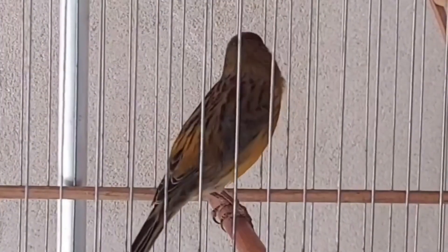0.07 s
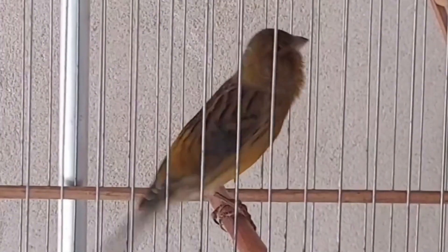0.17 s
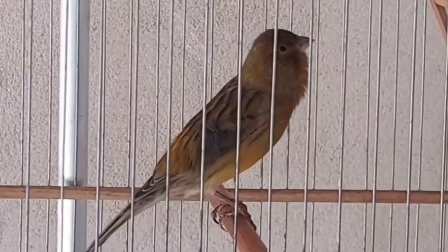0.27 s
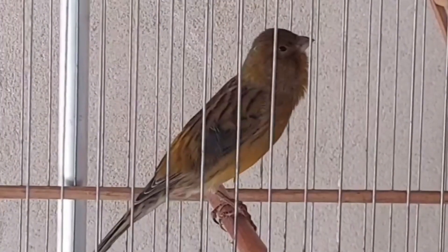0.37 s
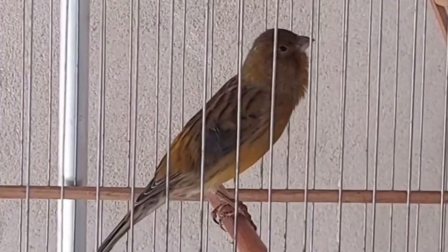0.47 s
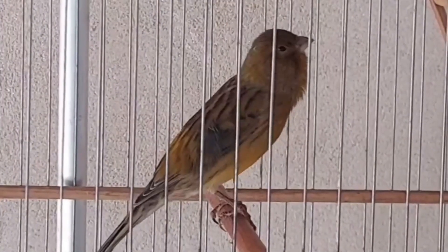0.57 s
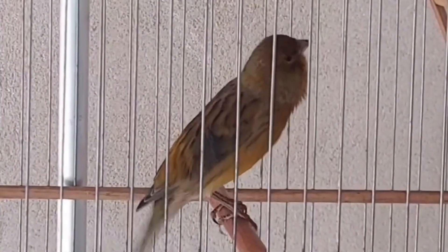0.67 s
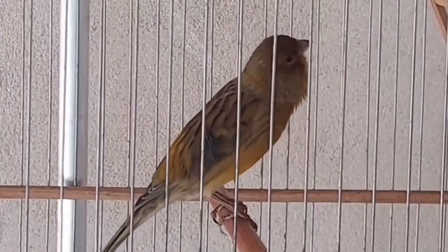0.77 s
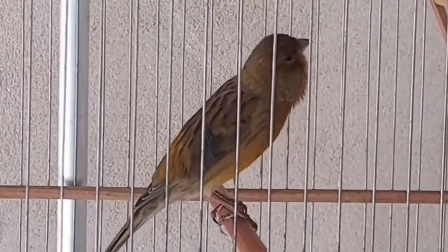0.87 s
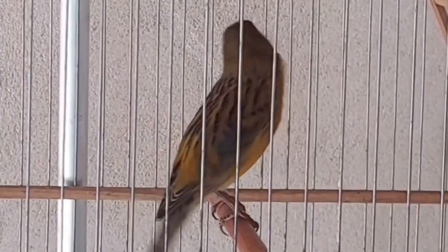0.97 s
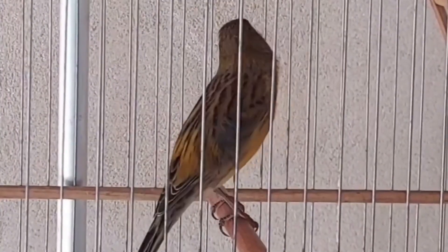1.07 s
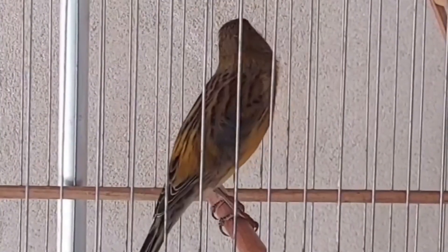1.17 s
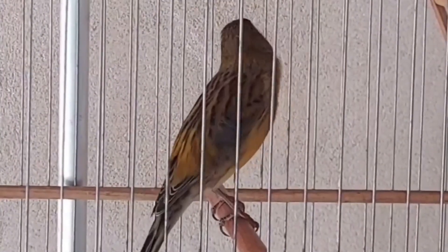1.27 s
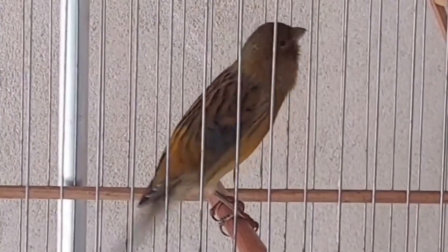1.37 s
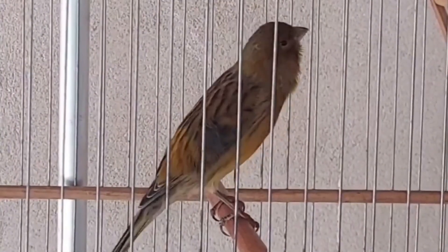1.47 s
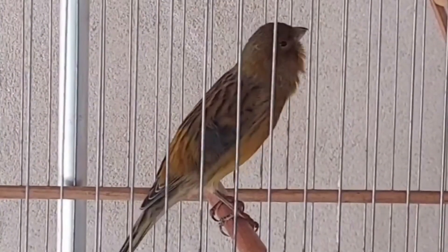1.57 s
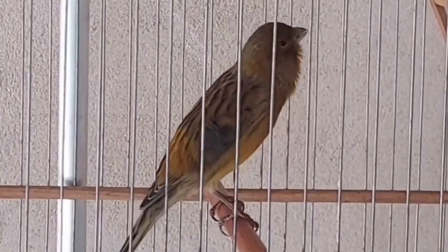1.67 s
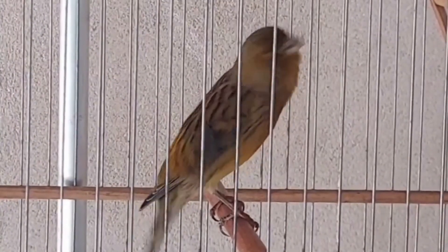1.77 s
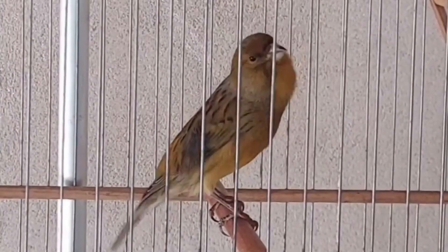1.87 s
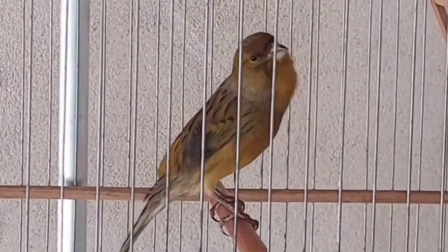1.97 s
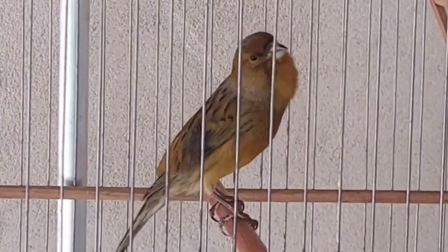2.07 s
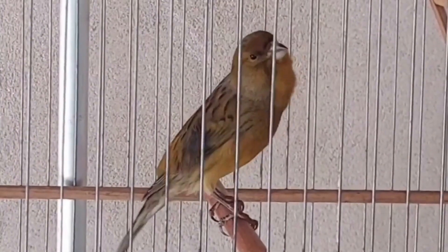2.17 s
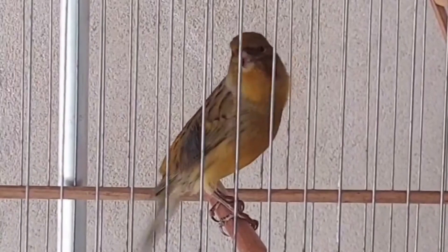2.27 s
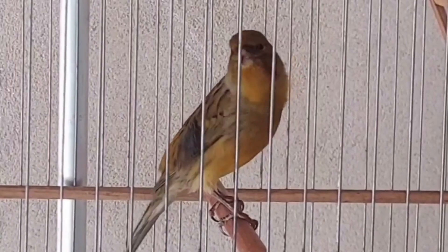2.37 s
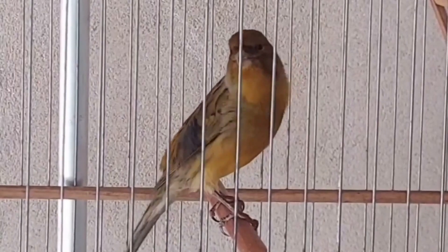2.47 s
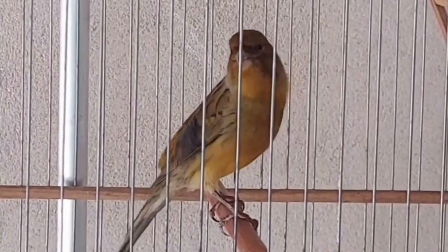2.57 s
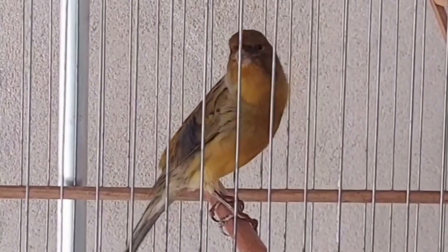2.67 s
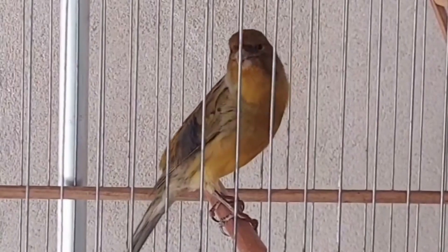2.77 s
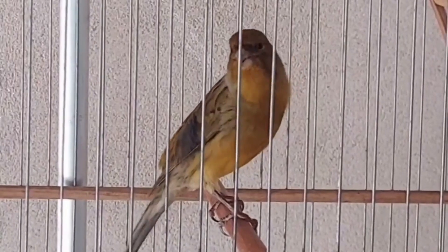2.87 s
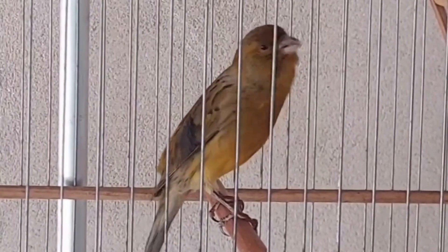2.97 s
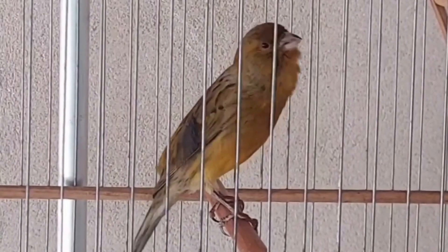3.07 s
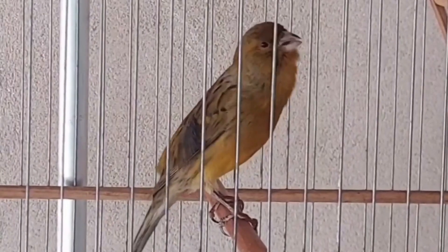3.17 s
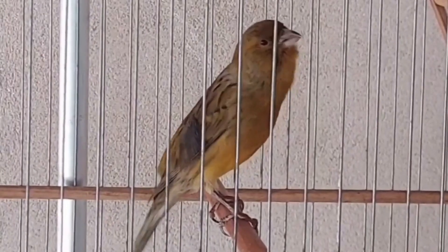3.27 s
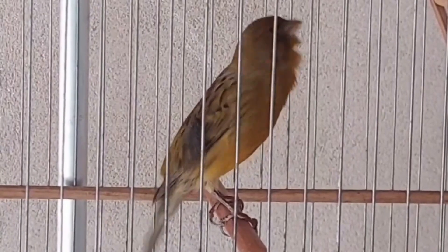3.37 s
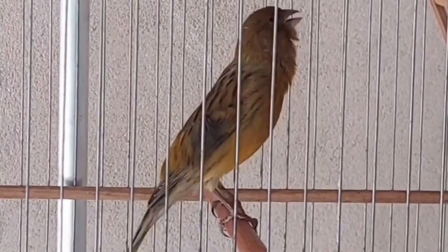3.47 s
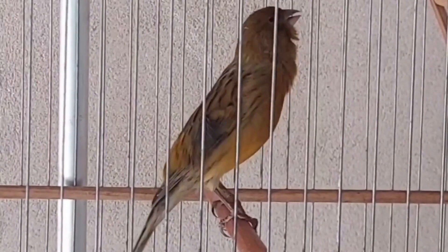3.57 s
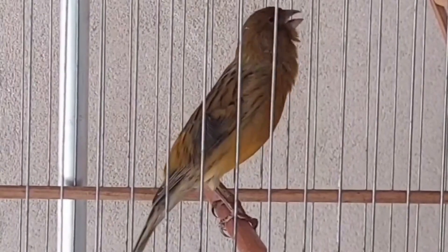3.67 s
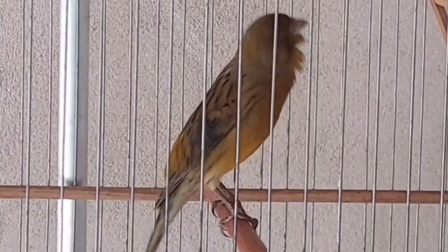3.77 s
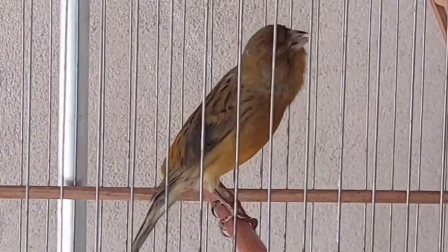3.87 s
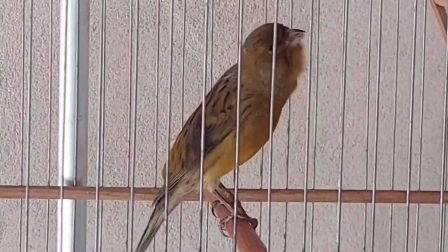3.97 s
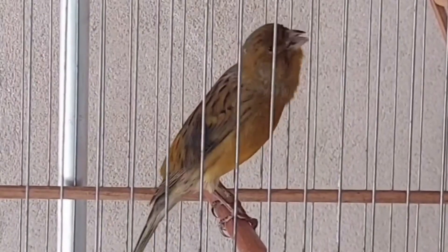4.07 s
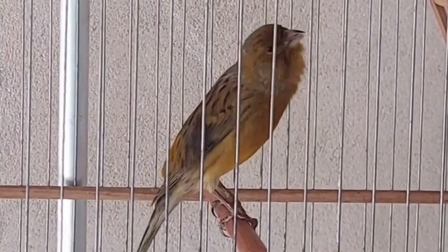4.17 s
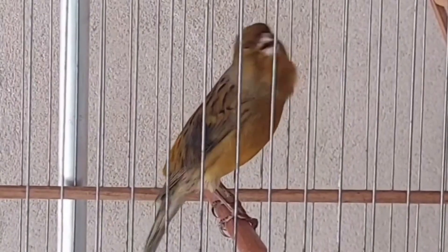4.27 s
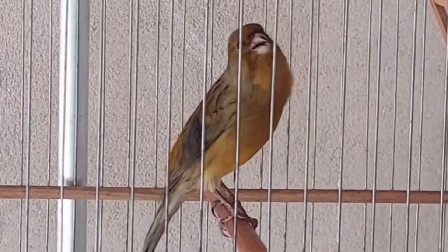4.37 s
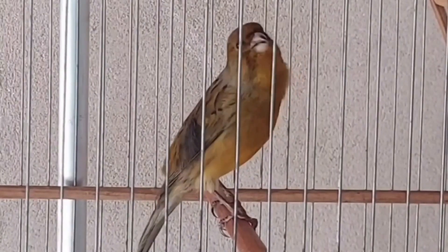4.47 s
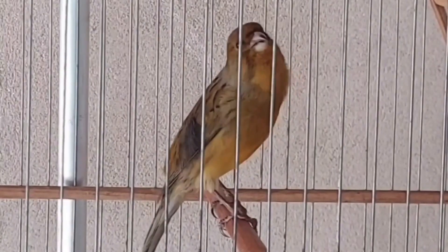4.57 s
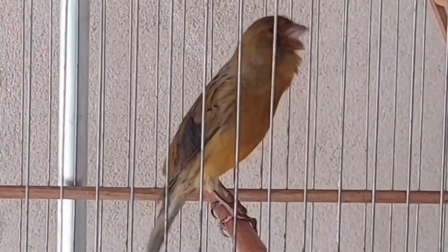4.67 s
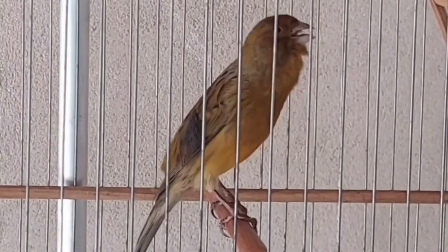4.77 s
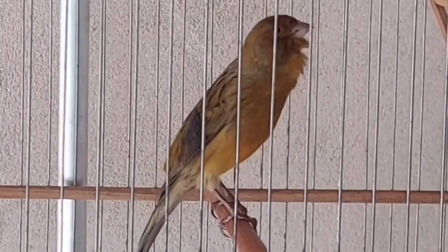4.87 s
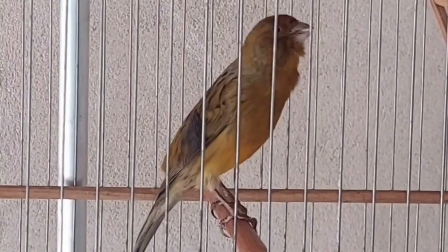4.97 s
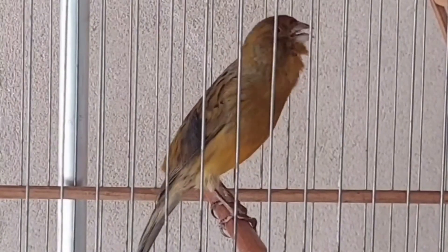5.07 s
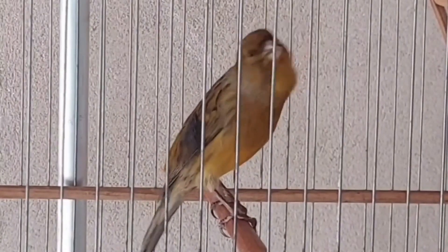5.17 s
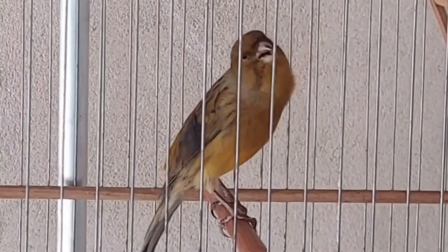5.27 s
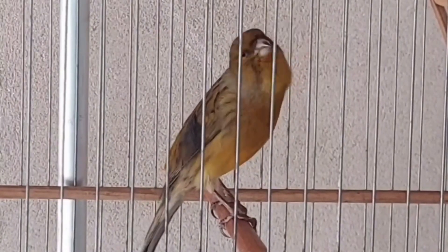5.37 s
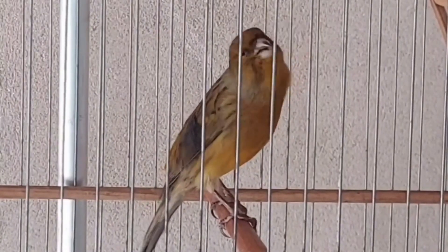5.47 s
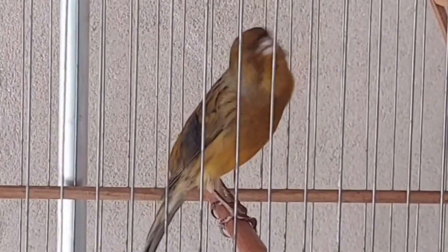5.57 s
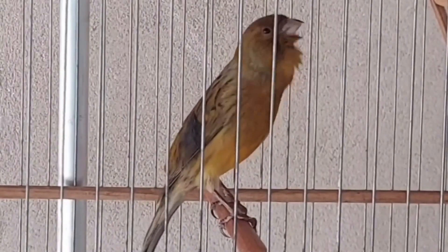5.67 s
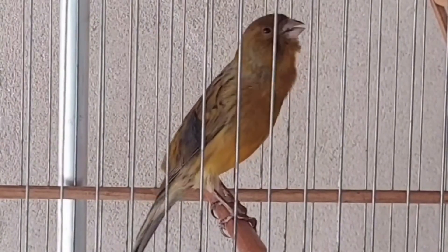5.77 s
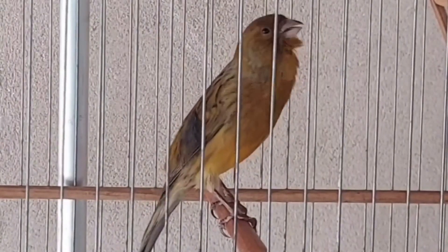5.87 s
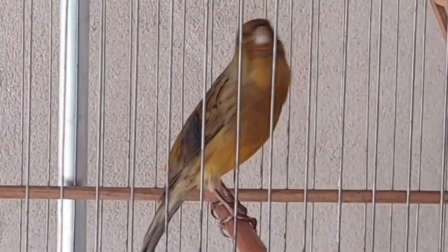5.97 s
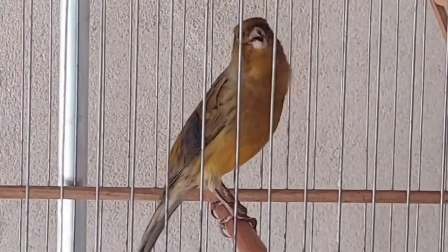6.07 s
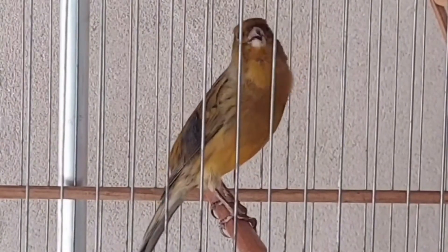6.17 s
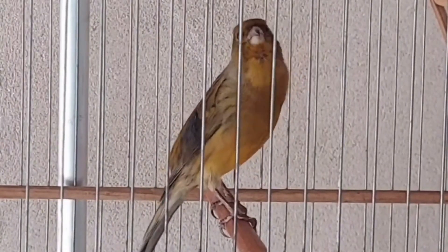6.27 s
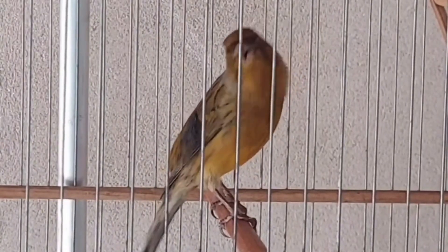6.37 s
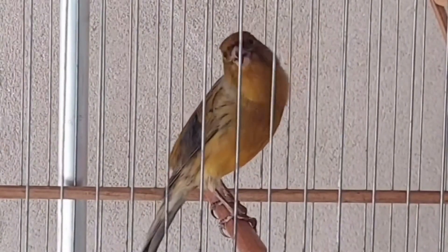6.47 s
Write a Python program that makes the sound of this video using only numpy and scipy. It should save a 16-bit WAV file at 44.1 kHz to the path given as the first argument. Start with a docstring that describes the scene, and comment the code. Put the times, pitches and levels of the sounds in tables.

```python
"""Caged canary, close up

A small, hard-walled room, the microphone close to the cage. A soft roll of quick upsweeps stops
briefly; then loud falling whistles follow, ever longer and slower, each an almost pure tone from the
bird's syrinx. The wall behind the cage and the room smear every note. Far off, a motor hums under
the room's rumble."""
import sys
import numpy as np
from scipy import signal
from scipy.fft import rfft, irfft
from scipy.io import wavfile
from scipy.ndimage import uniform_filter1d

SR = 44100
rng = np.random.default_rng(int(sys.argv[2]) if len(sys.argv) > 2 else 0)


def wrap_up_sound(samples):
    """Save the sound to the file named by the first command line argument, as 16-bit audio."""
    columns = np.atleast_2d(samples).T
    # keep every value between -1 and 1, then stretch to whole-number steps
    tamed = np.clip(columns, -1, 1)
    steps = np.round(tamed * 32767).astype(np.int16)
    wavfile.write(sys.argv[1], SR, steps)


N = 286650
TIME = np.arange(N) / SR
BIN_HZ = np.arange(N // 2 + 1) * SR / N


def undb(db):
    """Decibels to gain."""
    return 10 ** (np.asarray(db) / 20)


def unit(x):
    """Scale to rms 1."""
    return x / np.sqrt(np.mean(x ** 2))


def pan(right_db):
    """Left and right gains, the right one louder by right_db."""
    return undb([[-right_db / 2], [right_db / 2]])


def curves(table):
    """The columns of a time table, one value a sample."""
    s, *columns = np.transpose(table)
    return [np.interp(TIME, s, c) for c in columns]


def gain_at(hz, spectrum):
    """Gain from (Hz, dB) points on a log-frequency axis."""
    f, db = np.transpose(spectrum)
    return undb(np.interp(np.log(np.maximum(hz, 1)), np.log(f), db))


def walk(rate_hz, size):
    """Smooth random drift with spread 1 that changes about rate_hz times a second."""
    k = max(int(SR / rate_hz), 1)
    held = np.repeat(rng.standard_normal(size // k + 2), k)
    return unit(uniform_filter1d(uniform_filter1d(held, k), k))[:size]


def add(track, s, sound):
    """Mix a sound into a track at time s."""
    i = max(int(s * SR), 0)
    part = sound[:max(N - i, 0)]
    track[i:i + len(part)] += part


def along(shape, u):
    """Read (place, value) points at u; a place runs from 0 at a note's start to 1 at its end."""
    return np.interp(u, *np.transpose(shape))


def bump(u, place, width=0.1284):
    """A smooth hump around one place of a note, 1 at its top."""
    return np.exp(-((u - place) / width) ** 2)


def swell(u, peak, rise_db, fade_db):
    """Level in dB, 0 at the place peak, with one slope before and one after, both per note length."""
    return np.minimum(rise_db * (u - peak), fade_db * (peak - u))


def fall(shape, length_s, wander=0.00898):
    """Places along a whistle and its pitch there, corners rounded, never quite the same twice."""
    u = np.linspace(0, 1, int(length_s * SR))
    hz = uniform_filter1d(along(shape, u), size=len(u) // 12, mode="nearest")
    return u, hz * (1 + wander * walk(54, len(u)))


# Stereo width of the room tone at the microphone: f/Hz, side minus mid/dB
WIDTH = [(30, -4), (80, -5), (170, -12.5), (330, -9.5), (700, -2.5), (1400, -2)]
def stereo_noise(spectrum):
    """Coloured noise, most alike left and right in the upper bass and widest in the treble."""
    mid, side = rfft(rng.standard_normal((2, N))) * gain_at(BIN_HZ, spectrum)
    side = side * gain_at(BIN_HZ, WIDTH)
    return unit(irfft(np.array([mid + side, mid - side]), N))


# Spectra of the rumble, wash and hiss all around the microphone: f/Hz, relative density/dB
RUMBLE = [(22, -31), (42, -15), (56, -0.5), (78, -1.5), (100, 5), (125, -0.5), (145, -2.5), (190, -2.5),
          (300, -27), (1000, -38.5)]
WASH = [(100, -10.5), (145, 2.5), (195, -5), (230, 3), (300, -4), (380, -4), (430, -7), (750, -6.5),
        (1100, -14), (2000, -17.5), (6000, -59)]
HISS = [(1000, -26), (5000, 2.5), (7000, 11), (10300, 7), (11000, -24), (12000, -41), (14000, -46)]
# The wash swells and ebbs: t/s, relative level/dB
WASH_SWELL = [(0, -52), (2.15, -46), (2.7, -50), (3.8, -50.5), (4.5, -54.5), (6.5, -53)]
def room_tone(rumble_db=-54, wash_gain_db=2, hiss_db=-67):
    """Deep rumble a little to the right, a higher, slowly swelling wash and a faint even hiss."""
    swell_db, = curves(WASH_SWELL)
    rumble = undb(rumble_db) * pan(right_db=3) * stereo_noise(RUMBLE)
    wash = undb(swell_db + wash_gain_db) * stereo_noise(WASH)
    return rumble + wash + undb(hiss_db) * stereo_noise(HISS)


# A motor in the distance, slowly running down: t/s, firing rate/Hz
MOTOR_RATE = [(0, 85.6), (2.3, 86.24), (4.2, 83.76), (6, 80.97), (6.5, 81.5)]
# Its fundamental booms only at the end: t/s, relative level/dB
MOTOR_BOOM = [(2.2, -58), (5.4, -74), (6.05, -50), (6.5, -49)]
# Its drone comes and goes: t/s, relative level of second harmonic/dB, of third harmonic/dB
MOTOR_DRONE = [(0, -49, -68), (.6, -60.5, -60.5), (1.15, -49.5, -44), (1.5, -49.5, -53.5), (2.2, -50, -48),
               (2.8, -60, -51), (3.15, -49, -55.5), (3.8, -46.5, -54.5), (4.2, -56, -69), (5.4, -64, -60.5),
               (6.5, -48, -51)]
def motor(waver=0.01612, flutter_db=3):
    """The three lowest harmonics of a far motor's firing rate, wavering and slowly sinking."""
    hz, = curves(MOTOR_RATE)
    levels = curves(MOTOR_BOOM) + curves(MOTOR_DRONE)
    phase = 2 * np.pi * np.cumsum(hz * (1 + waver * walk(16, N))) / SR
    return sum(np.sqrt(2) * undb(db + flutter_db * walk(16, N)) * np.sin(k * phase)
               for k, db in enumerate(levels, 1))


def room_response(near_db=-3, near_s=0.019, tail_db=-1, gap_s=0.011, t60_s=0.74, treble_t60_s=0.39):
    """A quick scatter from the cage and the wall behind it, then the ring of the hard-walled room."""
    t = np.arange(SR) / SR
    hz = np.arange(SR // 2 + 1)
    near, tail = rng.standard_normal((2, 2, SR))
    near = near ** 3 * (t > 0.0008) * np.exp(-t / near_s)
    # the first returns from the walls are separate echoes that soon crowd together
    density = np.clip((t / 0.06) ** 2, 0.01, 1)
    tail = tail * (rng.random((2, SR)) < density) / np.sqrt(density) * (t > gap_s)
    low = irfft(rfft(tail) / (1 + (hz / 5000) ** 4), SR)
    tail = low * 1000 ** (-t / t60_s) + (tail - low) * 1000 ** (-t / treble_t60_s)
    return sum(undb(db) * part / np.linalg.norm(part, axis=1, keepdims=True)
               for db, part in [(near_db, near), (tail_db, tail)])


# The bird turns its head and opens its beak in front of the microphone:
# t/s, direct gain/dB, sheen gain/dB, high sheen gain/dB
POSTURE = [(0, -3.5, -34, -62), (1.4, -4.5, -32.5, -50), (1.6, -6.5, -26, -47), (2.4, -1, -28, -46),
           (3.4, -3, -39.5, -44), (3.7, -5, -23, -37.5), (4.6, -2.5, -28, -27), (5.4, -2, -26.5, -36.5),
           (6.5, -1, -28, -34)]
def room(song, left_lag_s=0.00001, beam_hz=8000, spill_db=-16):
    """The beak beams its overtones past the microphone, so they arrive mostly by way of the walls."""
    facing_db, *_ = curves(POSTURE)
    lowpass = 1 / (1 + (BIN_HZ / beam_hz) ** 8)
    off_axis = undb(spill_db) + (1 - undb(spill_db)) * lowpass
    direct = undb(facing_db) * irfft(rfft(song) * off_axis, N)
    left = np.interp(TIME - left_lag_s, TIME, direct)
    # the song is already under way, so the room rings with earlier notes from the start
    lead = SR // 7
    reflected = signal.fftconvolve(np.r_[song[:lead], song][None], room_response(), axes=1)
    return np.array([left, direct]) + reflected[:, lead:lead + N]


# Spectra of the airy edge on each note, heard close up, and its top band: f/Hz, relative density/dB
SHEEN = [(4500, -14), (6000, -10.5), (7200, -1), (7800, -19.5), (9300, 2), (10200, 9), (11000, 12.5),
         (11700, -23), (12500, -41)]
HIGH_SHEEN = [(11500, -44), (12300, -12), (12900, 9), (13400, -23), (13800, -10), (14300, -11)]
def sheen(song, smooth_s=0.012, flicker_db=3.05, flare_power=0.97):
    """Rough air that follows each note; its top band flares at the loudest moments, as the beak opens."""
    effort = np.sqrt(np.abs(uniform_filter1d(song ** 2, int(smooth_s * SR))))
    _, *levels = curves(POSTURE)
    bands = []
    for spectrum, db in zip((SHEEN, HIGH_SHEEN), levels):
        noise = unit(irfft(rfft(rng.standard_normal(N)) * gain_at(BIN_HZ, spectrum), N))
        bands.append(noise * undb(db + flicker_db * walk(60, N)))
    air, high_air = bands
    return effort * (air + high_air * (unit(effort) / 2) ** flare_power)


# How the small throat colours the fundamental: f/Hz, gain/dB
THROAT = [(1200, -1), (1750, -9.5), (2150, -3.5), (2800, -0.5), (5000, -2.5), (5600, -1.5), (7200, 4.5)]
# How strongly the overtones leave the beak: f/Hz, gain/dB
OVERTONES = [(3000, -71), (6000, -72), (7300, -34), (8000, -31), (9200, -24), (10400, -40.5), (11300, -30),
             (12500, -39), (14200, -58)]
def syrinx(hz, db, attack_s, release_s, waver, overtone_db, shimmer_db=1.96, glint_db=4, thin_db=9):
    """One note of the bird's voice: an almost pure, slightly unsteady tone with two faint overtones."""
    t = np.arange(len(hz)) / SR
    hz = hz * (1 + waver * walk(400, len(hz)))
    phase = 2 * np.pi * np.cumsum(hz) / SR
    gate = np.clip(t / attack_s, 0, 1) * np.clip((t[-1] - t) / release_s, 0, 1)
    tone = gain_at(hz, THROAT) * undb(db + shimmer_db * walk(259.9, len(hz))) * np.sin(phase)
    overtones = 0
    for k in (2, 3):
        gain = gain_at(k * hz, OVERTONES) * undb(-thin_db * (k - 1.5)) * (k * hz < SR / 2)
        overtones = overtones + gain * np.sin(k * phase)
    # the overtones follow the effort of the whole note
    effort = undb(np.max(db) + overtone_db + glint_db * walk(101, len(hz)))
    return np.sqrt(2) * np.sin(np.pi / 2 * gate) ** 2 * (tone + effort * overtones)


# Pips, faint even this near the cage: t/s, length/s, relative level/dB
PIPS = [(3.984, .013, -43), (4.198, .014, -46), (4.408, .016, -43), (4.63, .03, -40), (4.879, .02, -43),
        (5.114, .026, -50)]
def pips(from_hz=7250, to_hz=6250):
    """Short, thin falling notes that lead into most of the steep whistles."""
    out = np.zeros(N)
    for s, length_s, db in PIPS:
        hz = np.linspace(from_hz, to_hz, int(length_s * SR))
        add(out, s, syrinx(hz, db, attack_s=0.0031, release_s=0.0023, waver=0.016, overtone_db=-5))
    return out


# The opening roll, soft at the microphone; even, then slowing and swelling: t/s, relative level/dB
ROLL = [(0.013, -42.5), (0.052, -40), (0.079, -38), (0.115, -37.5), (0.146, -35), (0.185, -32),
        (0.208, -35.5), (0.248, -32.5), (0.28, -32), (0.317, -33.5), (0.346, -34), (0.381, -33),
        (0.411, -37), (0.444, -35), (0.475, -33.5), (0.507, -33), (0.537, -29.5), (0.571, -32.5),
        (0.601, -33.5), (0.636, -35.5), (0.667, -31.5), (0.705, -33.5), (0.735, -30), (0.771, -33),
        (0.803, -36), (0.835, -32.5), (0.867, -33), (0.902, -37.5), (0.934, -32.5), (0.972, -34),
        (1.008, -32), (1.045, -31), (1.083, -30), (1.125, -29), (1.165, -29), (1.209, -29.5), (1.248, -31),
        (1.292, -29), (1.334, -28.5)]
def roll(length_s=0.0175, low_hz=1720, first_top_hz=4330, last_top_hz=3830):
    """Crisp upsweeps, the beak nearly shut; each is loudest as it levels off, and their tops sink."""
    out = np.zeros(N)
    jitter = rng.uniform(-1.05, 1, (len(ROLL), 2))
    for (s, db), progress, (stretch, detune) in zip(ROLL, np.linspace(0, 1, len(ROLL)), jitter):
        u = np.linspace(0, 1, int(length_s * (1 + 0.1195 * stretch) * SR))
        top_hz = (first_top_hz + (last_top_hz - first_top_hz) * progress ** 2) * (1 + 0.018 * detune)
        hz = low_hz + (top_hz - low_hz) * np.sin(np.pi / 2 * u) ** 1.18
        peak = np.interp(progress, [0, 1], [0.65, 0.77])
        crescendo_db = np.interp(progress, [0, 1], [1, 3])
        level_db = db + crescendo_db + swell(u, peak, rise_db=13, fade_db=36.5)
        add(out, s, syrinx(hz, level_db, attack_s=0.002, release_s=0.004, waver=0.006,
                           overtone_db=-6, shimmer_db=1))
    return out


# Quick two-part whistles, close up: t/s, length/s, high voice's peak place/0-1, its climb/dB per note,
# relative level of high voice/dB, of low voice/dB, of the thread of tone between them/dB
QUICK = [(1.52, .1, 0.13, 12, -23.5, -25.5, -38), (1.654, 0.098, .16, 25, -20, -20, -36.5),
         (1.788, 0.1, 0.21, 23, -20, -20.5, -30.5), (1.925, 0.091, 0.21, 25, -18, -18, -64),
         (2.055, .086, .22, 27, -18, -19, -61), (2.179, 0.093, 0.22, 25, -20, -20.5, -34.5),
         (2.311, 0.09, .38, -9, -21, -21, -31), (2.448, 0.088, 0.4, 1, -21.5, -19, -31),
         (2.585, .101, 0.45, 24, -15, -20, -32), (2.728, 0.099, 0.47, 22, -15, -19.5, -38),
         (2.871, .094, .41, 28, -15, -19, -38), (3.012, 0.094, .4, 30, -14.5, -18, -25),
         (3.148, 0.1, .44, 24, -15, -20.5, -36), (3.296, 0.097, .44, 27, -14, -19.5, -34),
         (3.437, 0.092, .43, 29, -15.5, -20.5, -31)]
# Their common fall: place/0-1, f/Hz
QUICK_FALL = [(0, 5126), (.2, 4580), (.45, 3924), (.7, 3277), (.87, 2700), (1, 1160)]
def quick_whistles(low_peak=0.82, settle=0.122):
    """A trill of falls, each handed over from a high voice to a low one."""
    out = np.zeros(N)
    for note, progress in zip(QUICK, np.linspace(0, 1, len(QUICK))):
        s, length_s, high_peak, climb_db, high_db, low_db, thread_db = note
        # along the trill the high voice starts higher and holds on longer; the low one is cut off sooner
        lift_hz = np.interp(progress, [0, 1], [-110, 70])
        high_fade_db = np.interp(progress, [0, 1], [165, 95])
        low_fade_db = np.interp(progress, [0, 1], [70, 125])
        u, hz = fall(QUICK_FALL, length_s)
        hz = hz + lift_hz * np.exp(-u / settle)
        high = high_db + swell(u, high_peak, rise_db=climb_db, fade_db=high_fade_db)
        low = low_db + swell(u, low_peak, rise_db=100, fade_db=low_fade_db)
        thread = thread_db - low_fade_db * np.maximum(u - low_peak, 0)
        level_db = np.max([high, low, thread], axis=0)
        add(out, s, syrinx(hz, level_db, attack_s=0.013, release_s=0.005, waver=0.009, overtone_db=-1))
    return out


# Steep whistles, loud at the microphone: t/s, length/s, starting f/Hz, bend place/0-1, bend/Hz,
# relative level/dB, upper half against lower/dB, lift at the handover/dB
STEEP = [(3.604, 0.12, 5590, 0.36, -58, -16.5, -2.5, 4), (3.805, .13, 5670, 0.72, 49, -16, -2, -0.5),
         (4.015, 0.12, 5620, 0.41, -110, -15.5, -0.5, -0.5), (4.225, 0.13, 5600, 0.22, 76, -16.5, -2, 2),
         (4.439, 0.13, 5580, .7, 73, -15.5, .5, 2.5), (4.66, .157, 6020, .62, -186, -17.5, 4, -1.5),
         (4.896, 0.17, 6200, 0.4, 100, -16.5, 2, -0.5), (5.139, 0.17, 6240, 0.4, 205, -16, 1.5, -1)]
# Their nearly straight fall: place/0-1, f/Hz
STEEP_FALL = [(0, 5604), (.2, 4952), (.45, 3947), (.6, 3546), (.72, 2885), (.92, 1960), (1, 1450)]
# Their swell on the way down: f/Hz, gain/dB
STEEP_SWELL = [(1450, -15.5), (1800, -18.5), (2100, -9.5), (2600, -6), (3050, -4.5), (3540, 1.5),
               (3800, -9), (4000, -7.5), (4550, -2), (5100, -15), (5500, -10.5), (6200, -30)]
def steep_whistles(settle=0.33, handover=0.45):
    """Lengthening falls that start softly, sag where the high voice hands over, then swell."""
    out = np.zeros(N)
    for s, length_s, start_hz, bend_place, bend_hz, db, upper_db, handover_db in STEEP:
        u, hz = fall(STEEP_FALL, length_s)
        lift_hz = start_hz - STEEP_FALL[0][1]
        hz = hz + lift_hz * np.exp(-u / settle) + bend_hz * bump(u, bend_place)
        upper_half = np.clip((handover - u) * 10, 0, 1)
        level_db = db + 20 * np.log10(gain_at(hz, STEEP_SWELL))
        level_db += upper_db * upper_half + handover_db * bump(u, handover, width=0.14)
        add(out, s, syrinx(hz, level_db, attack_s=0.008, release_s=0.003, waver=0.01, overtone_db=-6))
    return out


# Slow last whistles, close up: t/s, length/s, bend place/0-1, bend/Hz, relative level/dB, accent/dB
SLOW = [(5.374, .222, .36, 141, -18, -1), (5.658, 0.22, 0.28, -110, -18, 1),
        (5.951, .223, 0.4, 36.5, -17.5, -2), (6.244, .229, 0.23, 92, -18, 0.5)]
# Their fall flattens, then drops away: place/0-1, f/Hz
SLOW_FALL = [(0, 4900), (.07, 4700), (.19, 4000), (.29, 3510), (.41, 2970), (.59, 2560), (.84, 2010),
             (.94, 1720), (1, 1280)]
# Their swell: place/0-1, gain/dB
SLOW_SWELL = [(0, -13), (.09, 1), (.19, -3), (.29, 0), (.45, -4.5), (.7, -8.5), (.86, -12), (.94, -16.5),
              (1, -27.5)]
def slow_whistles(accent_place=0.12):
    """Long falls that swell quickly; the tone thins out as the pitch drops away at the end."""
    out = np.zeros(N)
    for s, length_s, bend_place, bend_hz, db, accent_db in SLOW:
        u, hz = fall(SLOW_FALL, length_s)
        hz = hz + bend_hz * bump(u, bend_place)
        level_db = db + along(SLOW_SWELL, u) + accent_db * bump(u, accent_place)
        add(out, s, syrinx(hz, level_db, attack_s=0.011, release_s=0.00091, waver=0.0074, overtone_db=-3))
    return out


def scene(motor_gain_db=-2):
    """The canary close to the microphone, just right of centre, over the far motor and the room tone."""
    song = roll() + quick_whistles() + pips() + steep_whistles() + slow_whistles()
    bird = room(song + sheen(song)) * pan(right_db=0.5)
    return bird + undb(motor_gain_db) * motor() + room_tone()


def record(dry, top_hz=14300):
    """The recorder cuts off the highest treble."""
    return signal.sosfilt(signal.ellip(10, 0.2, 80, top_hz, fs=SR, output="sos"), dry)


dry = scene()
out = record(dry)
wrap_up_sound(out)
```